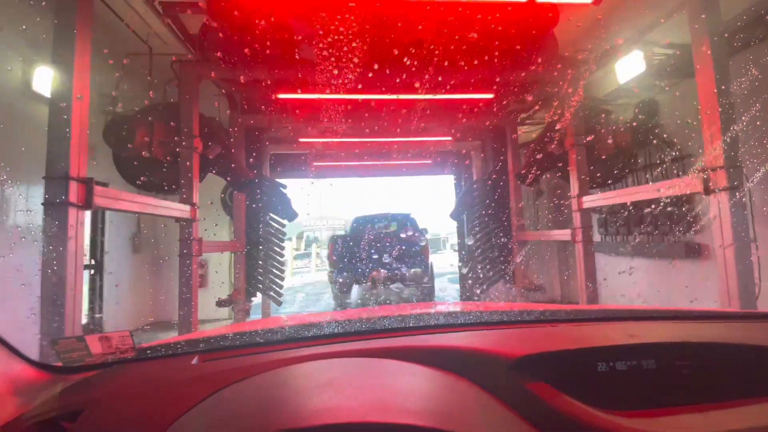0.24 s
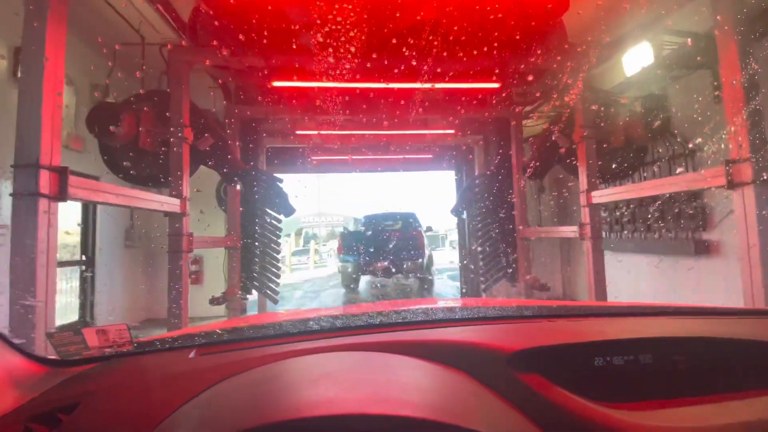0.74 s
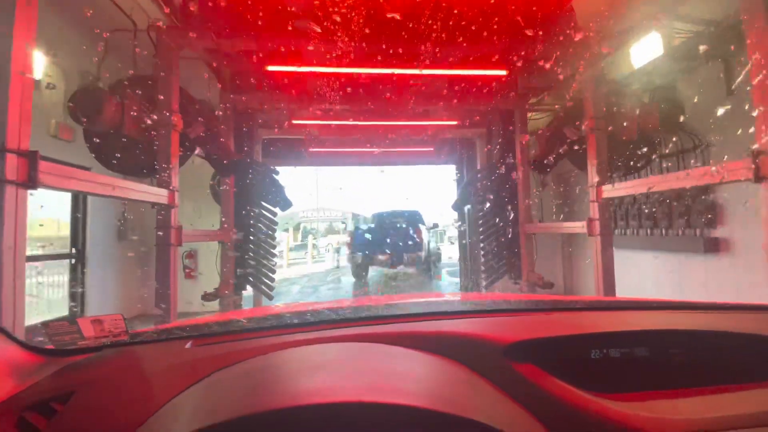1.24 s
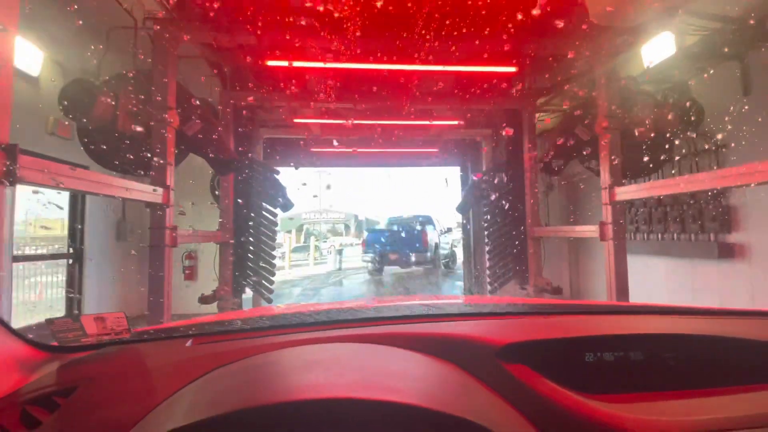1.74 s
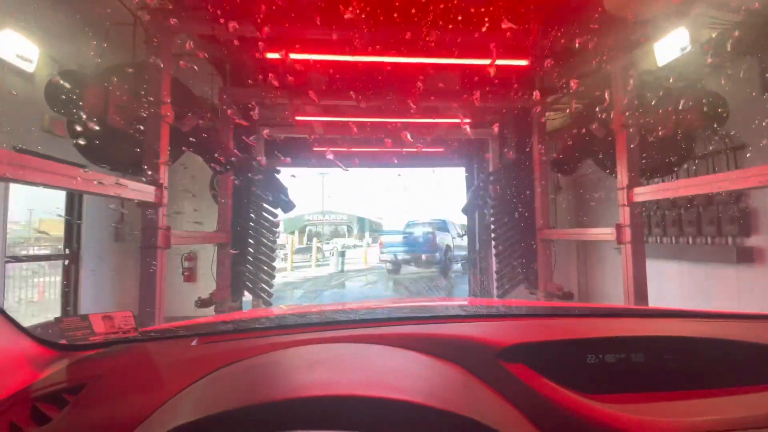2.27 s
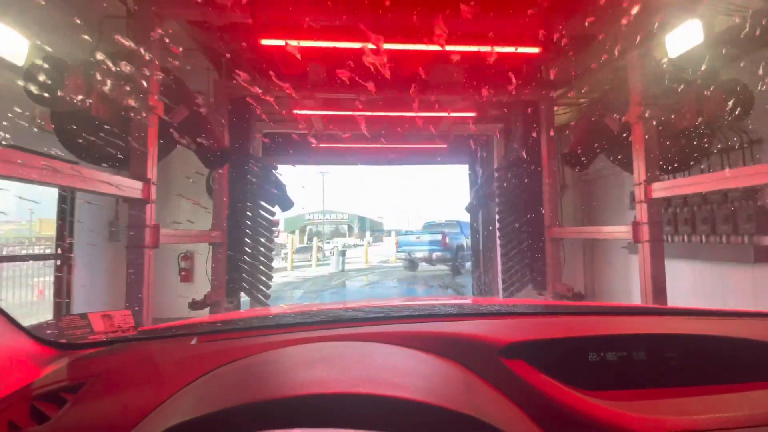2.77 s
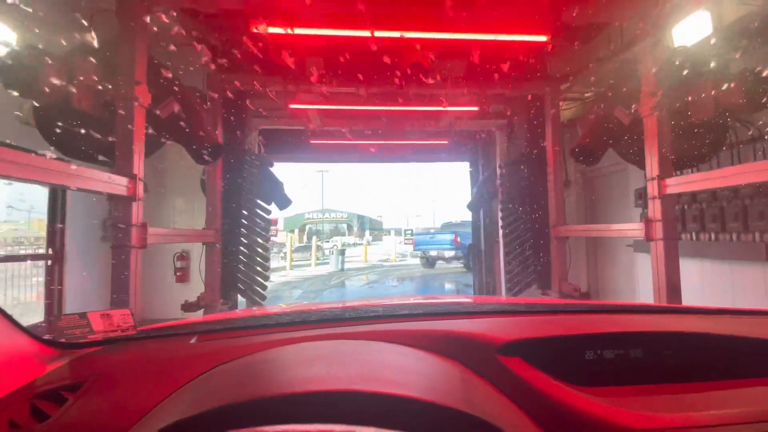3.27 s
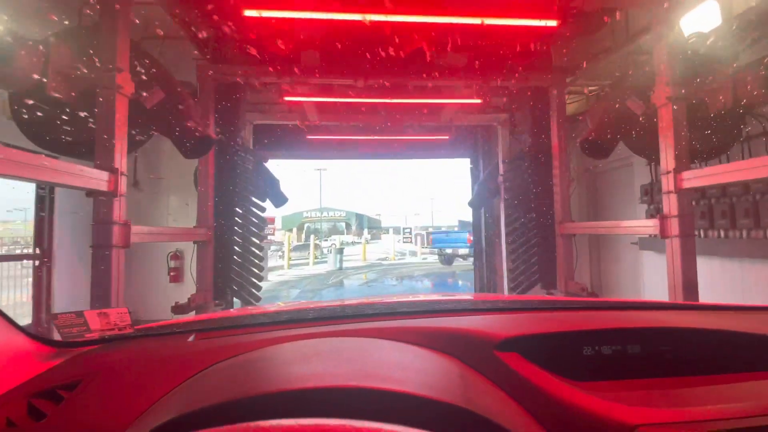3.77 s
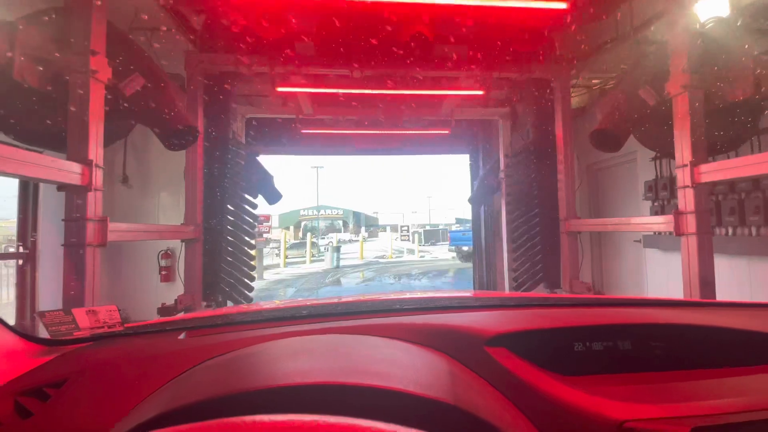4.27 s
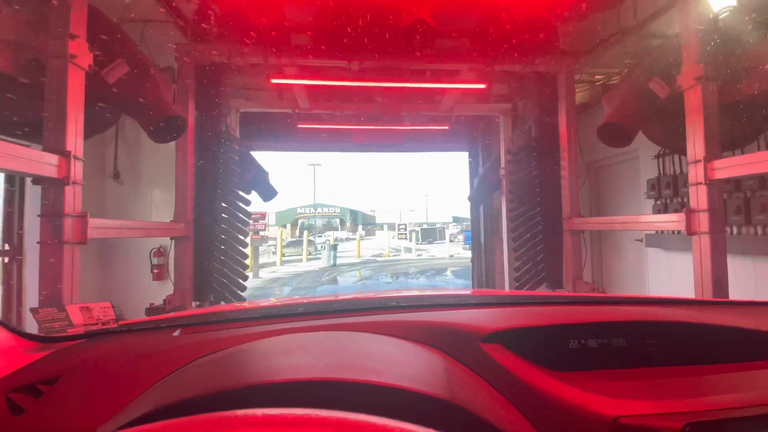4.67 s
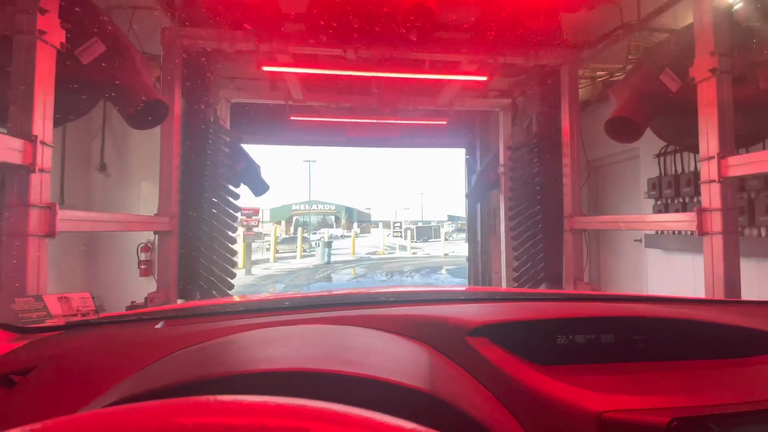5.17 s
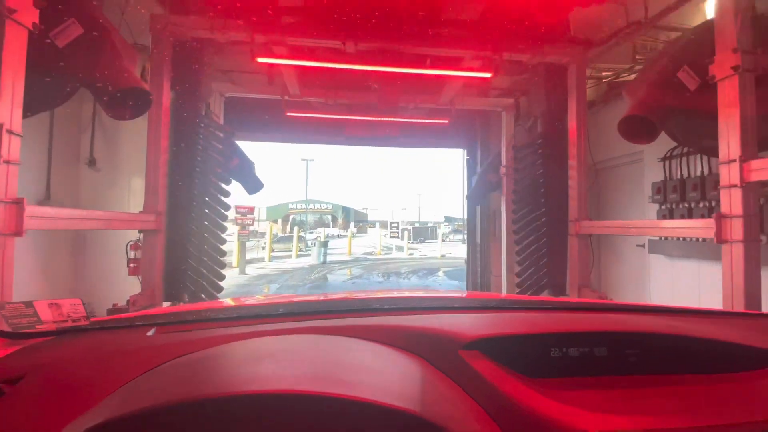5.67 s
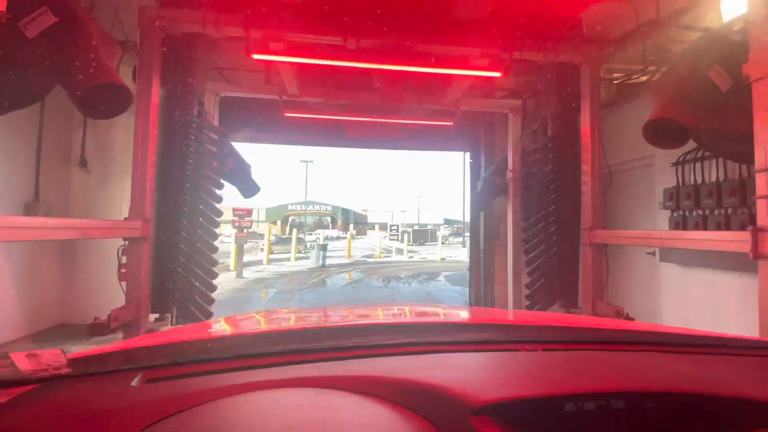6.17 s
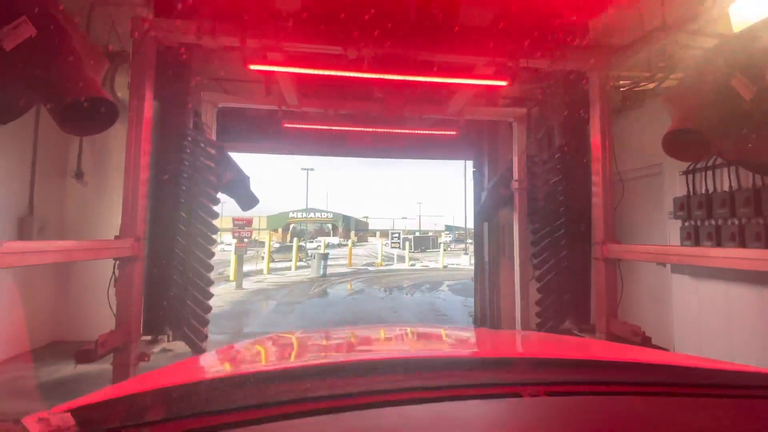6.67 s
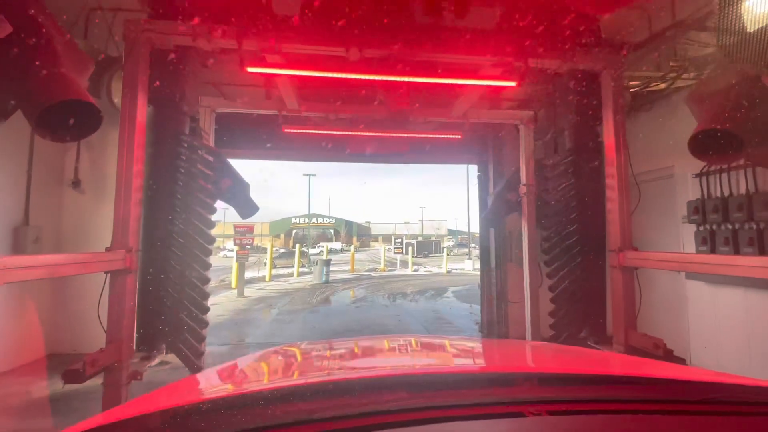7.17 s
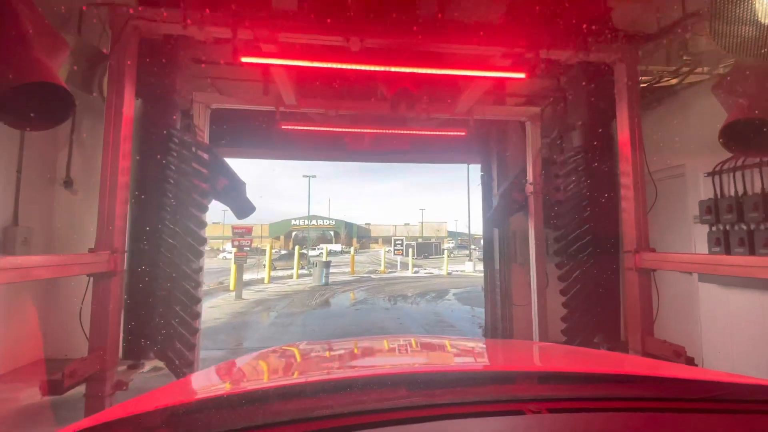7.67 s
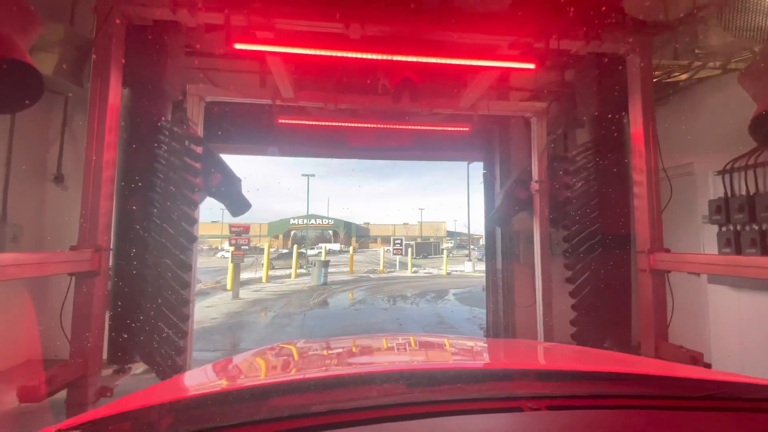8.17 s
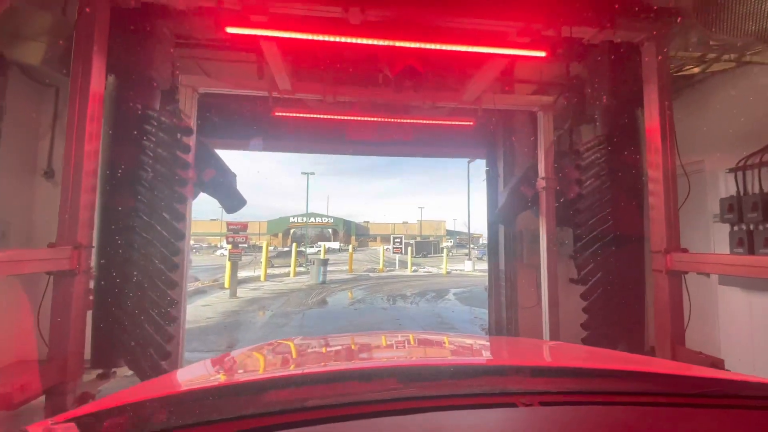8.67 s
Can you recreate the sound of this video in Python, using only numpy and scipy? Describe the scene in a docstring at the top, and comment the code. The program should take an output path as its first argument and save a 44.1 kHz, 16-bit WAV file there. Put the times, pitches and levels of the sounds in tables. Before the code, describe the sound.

From inside a closed car moving slowly through a wash dryer, a continuous broadband roar of blown air, strongest in the lows around 50 to 200 hertz, with a softer windy midrange and subdued hiss. From 0 to 3 seconds it builds steadily, especially in the bass. A second row of nozzles thickens it between 3.7 and 4.9, and a third from 6 to 7.3 adds brighter, harsher rush on the glass; it stays full to the end at about 9. Small buffeting swells come throughout, with a short jolt near 8.6. A low shaft hum near 59 hertz and very faint wavering blade whines are mostly buried. Tiny bright trim ticks occur around 4.2 to 4.7, near 6, then more often from 6.6, clearest at 5.9, 7.65 and 8.6. Sparse, faint drop clicks gradually become more frequent. Wide stereo, no pauses.

```python
"""Air jets buffet a car and roar on its glass, heard in the closed cabin as it creeps through a wash dryer.
The roar is coloured noise in overlapping bands, lifted by three rows of nozzles, with brief swells and dips
each around one pitch. Fan shaft and blade tones, wavering sines, show faintly through it. The trim ticks in
short bright noise bursts, and blown drops patter as random noise clicks, more and more often."""
import sys
import numpy as np
from scipy import signal
from scipy.fft import rfft, irfft, next_fast_len
from scipy.io import wavfile

SR = 44100
rng = np.random.default_rng(int(sys.argv[2]) if len(sys.argv) > 2 else 0)


def unload_wav(signal):
    """Save mono or channel-first audio to the path in sys.argv[1] as 16-bit WAV at rate SR, clipped to [-1, 1]."""
    wavfile.write(
        sys.argv[1],
        SR,
        np.round(np.clip(np.atleast_2d(signal).T, -1, 1) * 32767).astype(np.int16),
    )


N = 393372
SIZE = next_fast_len(N)  # noise length that transforms fast

# Colour of the air noise, as relative levels per Hz: f/Hz, level/dB
BODY_LOWS = [(18, -32.5), (30, -20), (40, -6.5), (50, -1.5), (66, -3.5), (132, -3.5), (148, -7),
             (162, -4.5), (182, -9), (195, -7), (215, -13.5), (245, -8.5), (310, -10), (380, -12),
             (450, -12), (490, -12.5), (540, -15.5), (590, -19), (640, -19), (675, -19)]     # through body and cabin
GLASS_MIDS = [(700, -18.5), (760, -17.5), (795, -22.5), (855, -19.5), (905, -24), (1000, -22.5),
              (1050, -24), (1120, -26.5), (1240, -23), (1370, -23), (1700, -27), (1950, -30.5), (2300, -33),
              (2650, -34.5), (3100, -31), (3830, -33.5)]    # through the glass
HISS_HIGHS = [(4400, -41), (5100, -42), (5500, -50), (6000, -46.5), (6900, -49.5), (7490, -58.5),
              (8100, -51.5), (8890, -51.5), (10500, -71), (11500, -66.5), (13500, -68.5), (14800, -80.5)]   # hiss, the top of the roar
# Stereo lean of the air noise: f/Hz, left minus right/dB
AIR_LEAN = [(35, 0.5), (48, 1), (64, 7), (91, 2), (160, 5.5), (210, -1.5), (250, 1), (320, -2), (520, 3),
            (750, 2.5), (1150, 1), (2670, 0), (4400, 1.5), (6500, 5.5), (8000, 0)]
# Share of the air noise common to both channels: f/Hz, likeness/0-1
LIKENESS = [(20, 1), (45, .995), (62, .95), (90, .82), (130, .93), (220, .55), (430, .45), (480, .2),
            (600, .6), (720, .2), (830, .55), (1050, .2), (1650, .5), (2300, .3), (11000, .35),
            (12000, .96)]
# Lag of the common noise on the right; lows arrive nearly together, mids late: f/Hz, phase behind left/rad
RIGHT_LAG = [(450, -.3), (490, 3.1), (1200, 3.4), (1900, 4.2), (2600, 6.6), (3500, 9.2), (4500, 12.2),
             (5800, 15.7), (7000, 18.6), (8000, 22.0), (11000, 22.0), (11700, 25.13)]
# The car creeps into the reach of three rows of nozzles: first felt t/s, fully felt t/s
NOZZLE_ROWS = [(0.0, 3.14), (3.7, 4.85), (6.0, 7.35)]
# Level change of the air noise as each row fades in: f/Hz, first row/dB, second row/dB, third row/dB
ROW_GAINS = [(50, 8.5, 0.1, 3), (88, 11, 1.5, 1.5), (133, 5.5, 2.5, 1), (200, 2.5, 2.5, 0),
             (262, 5, 1, 4.5), (354, 0.5, 1.5, 3.5), (496, 3, 1.5, 6.5), (650, 5, 0.5, 3.5),
             (860, 5, 0.5, 5), (1040, 3, 1, 0), (1400, 1, 3, 5), (1750, 2, -0.5, 5), (2200, 2.5, 2, 6),
             (3000, 3, 0, 5), (4900, 3, 1, 0.2), (10000, 4.5, 2, 3)]
# Brief swells and dips of the roar, each around one pitch:
# centre t/s, time from centre to 1/e/s, centre f/Hz, level change/dB
SWELLS = [(0.05, 0.23, 149, -0.5), (1.298, 0.22, 1400, 4.5), (1.176, 0.34, 220, 1.5), (2.8, 0.5, 300, 1.5),
          (3.5, 0.14, 54.5, 2.5), (4.16, 0.39, 142, 1.5), (4.528, 0.3, 378, 3.5), (4.9, 0.32, 109, 2.5),
          (5.55, 0.2, 55, 1), (6.0, 0.4, 2100, 1.5), (6.801, 0.3, 443, 1), (6.882, 0.29, 280, 4),
          (8.0, 0.32, 360, 3), (8.202, 0.17, 85, 2.5), (8.2, 0.43, 700, 1.5), (8.632, 0.02, 800, 6.5),
          (8.72, 0.1, 110, 3), (7.9, 0.33, 5000, 2), (0.1, 0.2, 700, 2.5), (2.0, 0.5, 1800, 0.5),
          (3.2, 0.6, 900, 1), (7.4, 0.3, 50, 2), (7.5, 0.12, 2490, 0), (8.45, 0.2, 1400, -1.5)]
SWELL_OCTAVES = 0.59  # from the centre pitch to 1/e of the level change
# Fan tone levels as the car creeps past: t/s, shaft level/dB, then first, second, third blade tone level/dB
FAN_LEVELS = [(0, -25, -43, -56, -44), (.5, -25, -43, -56, -48), (1.2, -24, -49, -54, -43),
              (2.0, -21, -52, -52, -44), (2.4, -21, -44, -48, -45), (2.85, -23, -37, -46, -42),
              (3.4, -21, -42, -45, -45), (4.0, -28, -47, -45, -44), (4.6, -27, -35, -42, -41),
              (5.4, -26, -39, -42, -43), (5.6, -25, -42, -35, -36), (5.95, -26, -39, -36, -36),
              (6.1, -23, -38, -44, -39), (6.75, -30, -33, -41, -39), (7.05, -25, -40, -41, -36),
              (7.6, -18, -38, -44, -45), (7.9, -23, -40, -49, -45), (8.15, -25, -42, -44, -39),
              (8.6, -27, -42, -44, -39), (8.92, -27, -43, -49, -43)]
# Blade tones: f/Hz, waver/dB, left minus right/dB, phase of right behind left/rad, octave overtone level/dB
BLADE_TONES = [(518, 2, 6, 2.8, -14), (690, 1.5, 2, 0, -25), (707.6, 1.8, -1, -.8, -12)]
SHAFT_HZ, SPEED_WANDER = 59.25, .0022  # wander is the typical share of the pitch
# Trim ticks: start t/s, gain of the filtered burst/dB, left minus right/dB
TRIM_TICKS = [(4.197, -48, -2), (4.530, -47, -1), (4.686, -47, 0), (5.928, -38, -4), (6.040, -44, -2),
              (6.611, -45, 0), (6.790, -43, 0), (7.234, -46, 2), (7.325, -44, 0), (7.506, -43, -2),
              (7.650, -37, -2), (7.755, -43, 0), (8.055, -45, 0), (8.640, -39, -1), (8.745, -44, 1)]
TOP_CUT_HZ = 15000


def air_jets(patch_db, flicker_db, hiss_flicker_db):
    """Turbulent roar: each band follows the jets at its pitch, with slow patches and a faster flicker."""
    hz, noise = turbulence()
    centres = np.geomspace(28, 14000, 32)
    place = np.interp(np.log(hz), np.log(centres), np.arange(len(centres)))
    out = 0
    for k, centre in enumerate(centres):
        crossfade = np.clip(1 - abs(place - k), 0, 1)  # neighbouring bands add up to 1
        band = irfft(noise * crossfade, SIZE)[:, :N]
        depth_db = hiss_flicker_db if centre > 6000 else flicker_db
        patches = patch_db * drift(0.77)
        flicker = depth_db * drift(11.6)
        out = out + band * amp(air_level(centre) + patches + flicker)
    return rms_one(out)


def turbulence():
    """Stereo noise spectrum with the roar's colour: part common to both channels, part the right's own."""
    hz = np.arange(SIZE // 2 + 1) * SR / SIZE + 1e-3
    common, own = rfft(rng.standard_normal((2, SIZE)))
    alike = np.clip(at_hz(LIKENESS, hz), 0, 1)
    lag = np.where(hz > 60, at_hz([(60, 0)] + RIGHT_LAG, hz), 0)
    right = alike * np.exp(-1j * lag) * common + np.sqrt(1 - alike ** 2) * own
    colour = amp(at_hz(BODY_LOWS + GLASS_MIDS + HISS_HIGHS, hz)) * (hz > 10)
    return hz, np.array([common, right]) * colour * sides(at_hz(AIR_LEAN, hz))


def air_level(hz):
    """Relative level in dB of the air near one pitch: nozzle rows fade in, brief swells and dips add."""
    points, t = np.array(ROW_GAINS), np.arange(N) / SR
    level_db = 0
    for k, (first_s, full_s) in enumerate(NOZZLE_ROWS):
        row_db = at_hz(points[:, [0, k + 1]], hz)
        reach = np.clip((t - first_s) / (full_s - first_s), 0, 1)
        level_db = level_db + row_db * (reach - .5)  # half below, half above the middle level
    for s, length_s, centre_hz, change_db in SWELLS:
        nearness = np.exp(-(np.log2(hz / centre_hz) / SWELL_OCTAVES) ** 2)
        level_db = level_db + change_db * nearness * bell(s, length_s)
    return level_db


def bell(s, length_s):
    """A bell-shaped rise and fall in time, top 1."""
    return np.exp(-((np.arange(N) / SR - s) / length_s) ** 2)


def fans():
    """Shaft unbalance hums once a turn; the blades whine at three higher pitches."""
    s, *columns = np.transpose(FAN_LEVELS)
    shaft_db, *blades_db = [np.interp(np.arange(N) / SR, s, column) for column in columns]
    out = whine(SHAFT_HZ, waver_db=0.7, lean_db=2.0, lag=0, octave_db=-16) * amp(shaft_db)
    for blade, level_db in zip(BLADE_TONES, blades_db):
        out = out + whine(*blade) * amp(level_db)
    return out


def whine(hz, waver_db, lean_db, lag, octave_db):
    """A fan tone with its octave: the speed wanders a little, the level wavers in the moving air."""
    turns = np.cumsum(hz * (1 + SPEED_WANDER * drift(4.6))) / SR + rng.random()
    angle = 2 * np.pi * turns - np.array([[0], [lag]])
    tone = np.sin(angle) + amp(octave_db) * np.sin(2 * angle)
    waver = amp(waver_db * drift(5.9) - waver_db / 2)
    return np.sqrt(2) * tone * sides(lean_db)[:, None] * waver


def trim_ticks(rise_s, decay_s):
    """Tiny plastic ticks: bright noise that swells in milliseconds and dies in tens of them."""
    out, t = np.zeros((2, N)), np.arange(4000) / SR
    band = signal.butter(4, [5000, 9700], "band", fs=SR, output="sos")
    envelope = (1 - np.exp(-t / rise_s)) * np.exp(-t / decay_s)
    for s, gain_db, lean_db in TRIM_TICKS:
        tick = signal.sosfilt(band, rng.standard_normal((2, len(t))) * envelope)
        i = round(s * SR)
        out[:, i:i + len(t)] += amp(gain_db) * sides(lean_db)[:, None] * tick
    return out


def drops(per_s_at_end, gain_db):
    """Blown drops patter on the glass: chance clicks on each side ring 4 ms noise, more often with time."""
    chance = per_s_at_end * (np.arange(N) / N) ** 2 / SR
    hits = (rng.random((2, N)) < chance) * amp(4.0 * rng.standard_normal((2, N)))  # strengths spread 4 dB
    envelope = signal.lfilter([1], [1, -np.exp(-1 / (.004 * SR))], hits + 1e-18)
    bursts = envelope * rng.standard_normal((2, N))
    band = signal.butter(2, [6000, 11000], "band", fs=SR, output="sos")
    return amp(gain_db) * signal.sosfilt(band, bursts)


def drift(rate_hz):
    """Slow chance: noise twice through a one-pole low-pass, spread about 1."""
    r = np.exp(-80 * np.pi * rate_hz / SR)  # one step every 40 samples
    noise = rng.standard_normal(N // 40 + 2002)
    slow = signal.lfilter([1], [1, -2 * r, r * r], noise)[2000:]  # skip the settling
    return np.interp(np.arange(N) / 40, np.arange(len(slow)), rms_one(slow))


def at_hz(points, hz):
    """Read a curve on a log-frequency axis."""
    curve = np.array(points)
    return np.interp(np.log(hz), np.log(curve[:, 0]), curve[:, 1])


def sides(lean_db):
    """Left and right gains for a lean in dB, left minus right."""
    return amp(np.multiply.outer([.5, -.5], lean_db))


def amp(db):
    """Decibels to gain."""
    return 10 ** (np.asarray(db) / 20)


def rms_one(x):
    """Scale to rms 1."""
    return x / np.sqrt(np.mean(x ** 2) + 1e-20)


def scene():
    """Air, fans, ticks and drops in the cabin."""
    air = amp(-12.0) * air_jets(patch_db=0.5, flicker_db=1.11, hiss_flicker_db=1.2)
    ticks = trim_ticks(rise_s=.002, decay_s=.016)
    return air + fans() + ticks + drops(per_s_at_end=12.0, gain_db=-55.0)


def gain_control(x, knee_db, share, release_db_s, attack_s):
    """Part of the level over the knee is taken back; the held peak level falls at a steady rate."""
    level_db = 20 * np.log10(abs(x).max(axis=0) + 1e-6)
    ramp = release_db_s * np.arange(N) / SR
    held_db = np.maximum.accumulate(level_db + ramp) - ramp
    over_db = np.maximum(held_db - knee_db, 0)
    r = np.exp(-1 / (max(attack_s, 1e-4) * SR))
    cut_db = signal.lfilter([1 - r], [1, -r], np.clip(share, 0, 1) * over_db)  # smoothed both ways
    return x * amp(-cut_db)


def record(dry):
    """Gain control evens the buffeting, peaks are rounded, the top is cut."""
    even = gain_control(dry, knee_db=-4.0, share=0.22, release_db_s=146.5, attack_s=0.0011)
    rounded = 1.3 * np.tanh(even / 1.3)
    top_cut = signal.ellip(10, .5, 70, TOP_CUT_HZ, fs=SR, output="sos")
    return signal.sosfilt(top_cut, rounded)


dry = scene()
out = record(dry)
unload_wav(out)
```